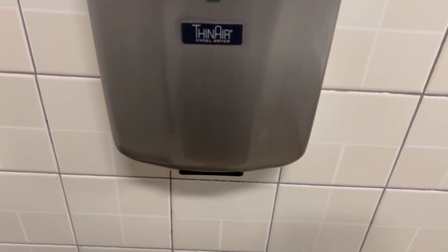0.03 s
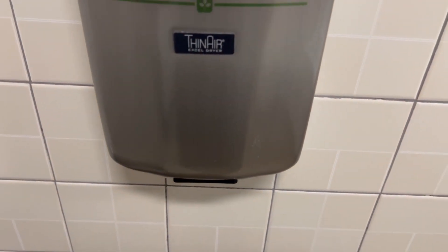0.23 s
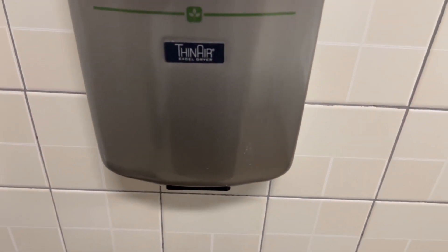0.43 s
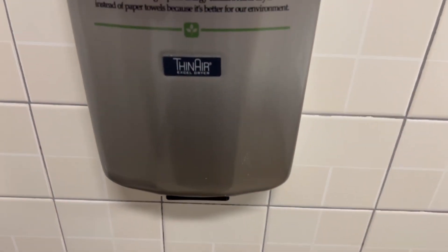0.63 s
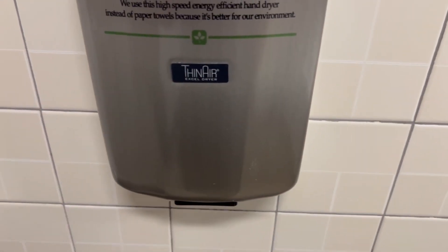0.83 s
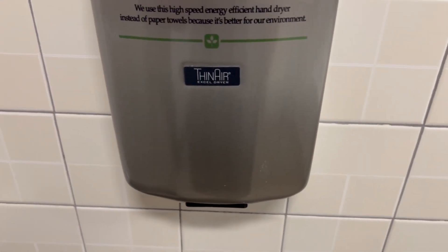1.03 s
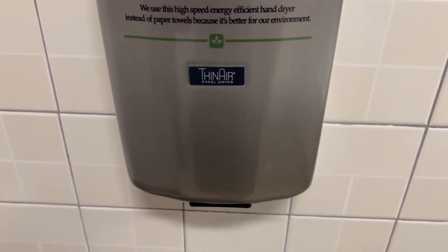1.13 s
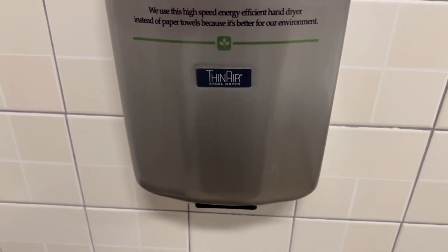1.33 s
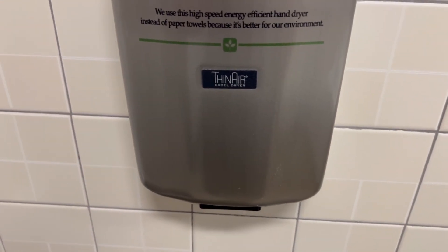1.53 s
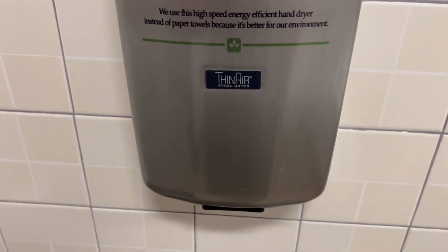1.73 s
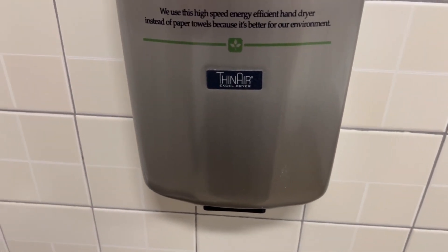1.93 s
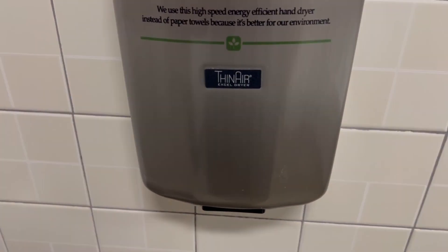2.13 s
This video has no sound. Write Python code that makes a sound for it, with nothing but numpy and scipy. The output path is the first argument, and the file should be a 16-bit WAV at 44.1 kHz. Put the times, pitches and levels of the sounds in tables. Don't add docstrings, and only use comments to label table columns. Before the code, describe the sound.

A wall hand dryer coasts to a stop, airy whine sinking to a soft brush hiss

```python
import sys
import numpy as np
from scipy import signal
from scipy.fft import rfft, irfft, next_fast_len
from scipy.io import wavfile
from scipy.ndimage import uniform_filter1d

SR = 44100
rng = np.random.default_rng(int(sys.argv[2]) if len(sys.argv) > 2 else 0)


def elevation(decibels):
    levels = np.asarray(decibels, float)
    return 10 ** (levels / 20)


def master(y):
    cut = np.clip(np.atleast_2d(y).T, -1, 1)
    pcm = np.round(cut * 32767)
    wavfile.write(sys.argv[1], SR, pcm.astype(np.int16))


N = 96402

LEAD_S = 1.0
LEAD = int(LEAD_S * SR)
M = next_fast_len(N + LEAD + SR)
F = np.maximum(np.arange(M // 2 + 1) * SR / M, 1.)


def curve(table, col=1):
    a = np.array(table, float)
    return np.interp(np.log(F), np.log(a[:, 0]), a[:, col])


def peak(hz, width_hz):
    return 1 / (1 + 1j * (F ** 2 - hz ** 2) / (F * max(width_hz, 1.)))


def unit(x):
    return x / np.sqrt(np.mean(x ** 2))


def walk(rate):
    hold = int(SR / rate)
    levels = np.repeat(rng.standard_normal(M // 200), hold)[:M]
    return 1.29 * uniform_filter1d(uniform_filter1d(levels, hold), hold)


def tones(table, speed, halvings, wobble, flutter_db):
    out = 0
    for multiple, db, loss_db in table:
        phase = 2 * np.pi * np.cumsum(multiple * speed * (1 + wobble * walk(70))) / SR
        level = elevation(db - loss_db * halvings + flutter_db * walk(22.17))
        out = out + np.sqrt(2) * level * np.sin(phase)
    return out


def balance(table):
    return elevation(np.array([[.5], [-.5]]) * curve(table))


def pair():
    # frequency in Hz, left-right correlation
    alike = [(60, 0.7), (130, 0.97), (290, 0.54), (640, 0.48), (1410, -0.22), (3100, 0.055), (6820, -0.21),
             (8300, -0.045), (9600, 0.66), (13800, 0.95), (15300, 0.89)]
    lag_s, lag_from_hz = 1 / 3650, 4725
    c = np.clip(curve(alike), -.9, .995)
    mid, side = rfft(rng.standard_normal((2, M)))
    left_only, side_sign = np.array([[1], [0]]), np.array([[1], [-1]])
    lag = np.exp(-2j * np.pi * lag_s * np.maximum(F - lag_from_hz, 0) * left_only)
    return lag * (np.sqrt(1 + c) * mid + side_sign * np.sqrt(1 - c) * side) / 2


def building_hum():
    # frequency in Hz, spectral level in dB per Hz
    floor = [(25, -42), (140, -4.5), (480, -14.5), (1200, -29), (3400, -13), (5100, -29), (7400, -4.5),
             (15000, -79)]
    return elevation(-69) * unit(irfft(pair() * elevation(curve(floor)), M))


def low_tones(t):
    # start in seconds, length in seconds, frequency in Hz, level in dB
    events = [
        (1.357, 0.15, 71.3, -69),
        (1.517, 0.087, 129.8, -65.5),
        (1.637, 0.086, 141.8, -61.5),
        (1.689, 0.2363, 69.6, -65),
    ]
    edge_s = 0.035
    out = 0
    for start, length, hz, db in events:
        inside_s = np.minimum(t - start, start + length - t)
        swell = np.clip(inside_s / edge_s + .5, 0, 1)
        out = out + np.sqrt(2) * elevation(db) * swell * np.sin(2 * np.pi * hz * t)
    return out


def room():
    # frequency in Hz, 60 dB decay time in seconds, left level in dB, right level in dB
    room_modes = [(68.9, 0.95, 10.5, 11), (146.8, 0.79, 10.5, 12), (172.3, 1, 13.5, 2), (199.9, 0.6, 6, 4),
                  (253, 0.82, 12, 10.5), (273.7, 0.84, 7, 0), (339.5, 0.23, 4.5, 2), (366, 0.74, 4, -17),
                  (435, 0.84, 3.5, 4.5), (478.4, 0.89, 8.5, -14), (491, 0.64, 4, 6.5),
                  (511.5, 0.57, 8, 10.5), (586.6, 1, 13.5, -6), (642.3, 1, 13, 18.5)]
    tail_t60_s, tail_db, tail_low_hz, tail_high_hz = 1, 1, 463, 8000
    tail = rng.standard_normal((2, M)) * 1000. ** (-np.arange(M) / SR / tail_t60_s)
    diffuse = elevation(tail_db) * rfft(tail / np.sqrt(np.sum(tail[0] ** 2)))
    near = 1 + diffuse / (1 + (tail_low_hz / F) ** 4) / (1 + (F / tail_high_hz) ** 10)
    modes = 0
    for k, (hz, t60, *ear_db) in enumerate(room_modes):
        width_hz = np.log(1000) / np.pi / t60
        modes = modes + (-1) ** k * elevation(np.array(ear_db)[:, None]) * peak(hz, width_hz)
    return near, modes


def brushes(speed):
    # frequency in Hz, width in Hz, level in dB
    shell_rings = [(2460, 370, -5.5), (3390, 330, -7.5), (3860, 250, -14), (4478, 385, -14),
                   (5357, 420, -11.5), (6660, 510, -2.5), (7280, 84, 0), (7850, 190, -10), (8050, 330, -5),
                   (9700, 920, -18.5), (11300, 580, -17.5), (13400, 1700, -30), (15650, 2000, -22.5)]
    # frequency in Hz, left minus right in dB
    brush_pan = [(2500, 12), (7000, 4), (9000, 0)]
    brush_db, knee_hz, flicker_db = -60.5, 52.4, 2.3
    noise = pair() * balance(brush_pan) / (1 + (2200 / F) ** 6)
    shell = 0
    for hz, width_hz, db in shell_rings:
        ring = irfft(noise * np.abs(peak(hz, width_hz)) ** 2, M)
        shell = shell + ring * elevation(db + flicker_db * walk(11))
    drag = speed ** 2 / (speed ** 2 + knee_hz ** 2)
    return unit(shell) * drag * elevation(brush_db)


def housing():
    # frequency in Hz, width in Hz, boost in dB
    cavities = [(480, 88, 6), (636, 18, 5.5), (1343, 188, 8.5), (1639, 63, 12.5), (1950, 91, 3),
                (2169, 93, 9), (2577, 193, 11.5), (3220, 220, 8), (3710, 980, 5), (5200, 290, 4),
                (6180, 230, 6.5)]
    return 1 + sum((elevation(db) - 1) * np.abs(peak(hz, w)) ** 2 for hz, w, db in cavities)


def air(halvings):
    # frequency in Hz, spectral level in dB per Hz, loss in dB per halving of speed
    rush = [(58.5, -32.5, -4), (144, -13, 0.5), (547, -8.5, 6), (718, -16.5, 6), (1290, -13, 10.5),
            (2290, -12.5, 13), (3130, -27, 12.5), (7040, -16, 24.5), (16800, -30, 18.5)]
    air_db, flicker_db = -39, 2.5
    stall_db = 1
    noise = pair() * elevation(curve(rush)) * housing()
    noise = noise / np.std(irfft(noise, M))
    loss = curve(rush, col=2)
    out = 0
    for step in range(19):
        hz = 40 * 2 ** (step / 2)
        band = np.cos(np.pi / 2 * np.clip(2 * np.log2(F / hz), -1, 1)) ** 2
        loss_db = loss[min(int(hz * M / SR), len(F) - 1)]
        level_db = air_db - (loss_db + stall_db * halvings) * halvings + flicker_db * walk(13.674)
        out = out + irfft(noise * band, M) * elevation(level_db)
    return rfft(out)


def blades(speed, halvings):
    # multiple of shaft speed, level in dB, loss in dB per halving of speed
    whine = [(6.95, -47, 8), (13.85, -52, 24), (18, -53, 26)]
    # frequency in Hz, width in Hz of a band the duct lets out
    duct_bands = [(2890, 660), (6170, 340)]
    # frequency in Hz, width in Hz, level in dB of a narrow duct ring
    duct_rings = [(3160, 14, 4.5), (3027, 54, 1), (2770, 76, 8)]
    duct = sum(1 / (1 + (2 * (F - hz) / w) ** 4) for hz, w in duct_bands)
    duct = duct * (1 + sum(elevation(db) * peak(hz, w) for hz, w, db in duct_rings))
    return rfft(tones(whine, speed, halvings, wobble=.016, flutter_db=2.5)) * duct


def bearing(speed, halvings):
    # multiple of shaft speed, level in dB, loss in dB per halving of speed
    bearing_tones = [(2.0, -53.5, -0.5), (2.84, -37.5, 7), (3.8, -42, 4.5), (4.62, -47.5, 6),
                     (5.5, -56.5, 1.5)]
    # frequency in Hz, width in Hz, level in dB of a cover resonance
    panel = [(499, 65, -1), (433, 26, -9), (339.5, 45, -12)]
    wake_hz = 204
    cover = 0.052 + sum(elevation(db) * np.abs(peak(hz, w)) ** 2 for hz, w, db in panel)
    rumble = tones(bearing_tones, speed, halvings, wobble=.006, flutter_db=2.5)
    return rfft(rumble / (1 + (speed / wake_hz) ** 6)) * cover


def shaft(speed, shaft_level_db):
    gain = elevation(shaft_level_db + 3 * walk(23.72))
    return rfft(np.sqrt(2) * gain * np.sin(2 * np.pi * np.cumsum(speed) / SR))


def scene():
    # time in seconds, shaft speed in Hz, level of the beating shaft tone in dB
    rotor = np.array([(-.1, 476, -61), (0, 463, -40.5), (.056, 447, -49.5), (0.099, 435, -44.5),
                      (.146, 418, -46), (0.189, 390.6, -58), (0.219, 372.1, -59.5), (0.259, 354, -52.5),
                      (0.317, 331, -59.5), (.374, 312, -47), (.42, 296, -60), (.455, 290, -58),
                      (0.483, 280, -44), (.542, 265, -51), (.61, 249, -43.5), (.646, 241, -41.5),
                      (0.681, 235, -60), (.73, 226, -45), (.77, 219, -59), (.828, 209, -49.5),
                      (0.868, 200, -54.5), (.94, 187, -52.5), (1.06, 166, -58), (1.12, 156, -55.5),
                      (1.264, 131, -59), (1.33, 122, -63), (1.45, 105, -70), (1.6, 85, -85),
                      (1.75, 68, -81), (2.2, 36, -100)])
    # frequency in Hz, left minus right in dB
    pan = [(60, -2.5), (110, 4.5), (200, -4), (380, 2), (700, 3), (1290, 4.0), (2380, 6.5), (4400, 8),
           (7500, 7.5), (9300, -0.5), (15000, 0)]
    start_hz = 470
    shaft_modes_db, line_modes_db, air_modes_db, line_direct_db = -6, -3, -2.5, -3
    t = np.arange(M) / SR - LEAD_S
    speed = uniform_filter1d(np.interp(t, rotor[:, 0], rotor[:, 1]), size=900)
    shaft_level_db = uniform_filter1d(np.interp(t, rotor[:, 0], rotor[:, 2]), size=900)
    halvings = np.log2(start_hz / speed)
    near, modes = room()
    lines = bearing(speed, halvings) + blades(speed, halvings)
    dryer = air(halvings) * (near + elevation(air_modes_db) * modes)
    dryer = dryer + lines * (elevation(line_direct_db) * near + elevation(line_modes_db) * modes)
    dryer = dryer + shaft(speed, shaft_level_db) * (1 + elevation(shaft_modes_db) * modes)
    mix = building_hum() + low_tones(t) + brushes(speed) + irfft(dryer * balance(pan), M)
    return mix[:, LEAD:LEAD + N]


def roll_off(x):
    return signal.sosfilt(signal.butter(12, 16400, fs=SR, output="sos"), x)


def record(dry):
    # frequency in Hz, width in Hz, depth in dB
    port_dips = [(12050, 400, -24)]
    port = 1. * (F < 15740)
    for hz, width_hz, db in port_dips:
        port = port * elevation(db * np.exp(-((F - hz) / width_hz) ** 2))
    mix = irfft(rfft(dry, M) * port, M)[:, :N]
    return roll_off(mix)


dry = scene()
out = record(dry)
master(out)
```